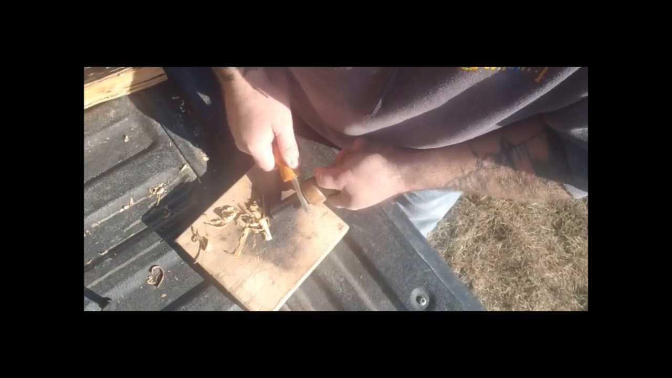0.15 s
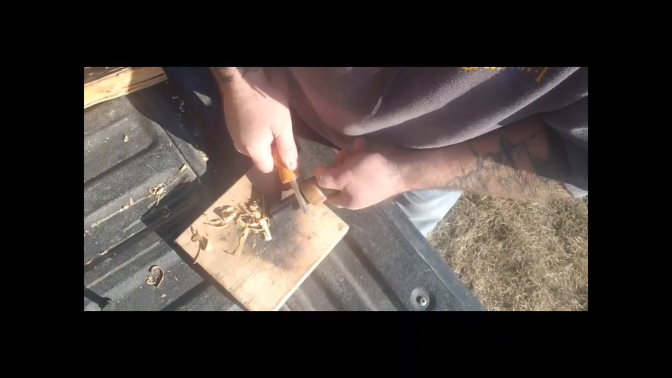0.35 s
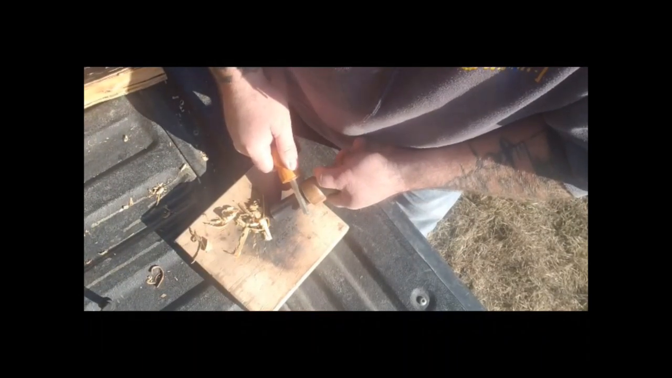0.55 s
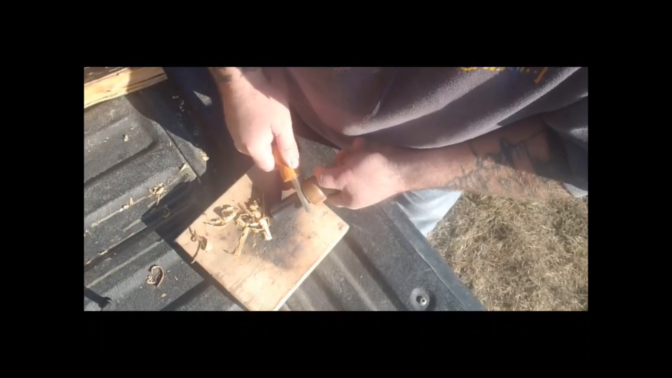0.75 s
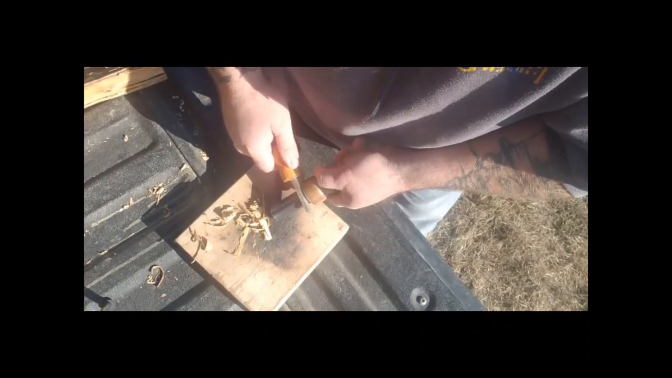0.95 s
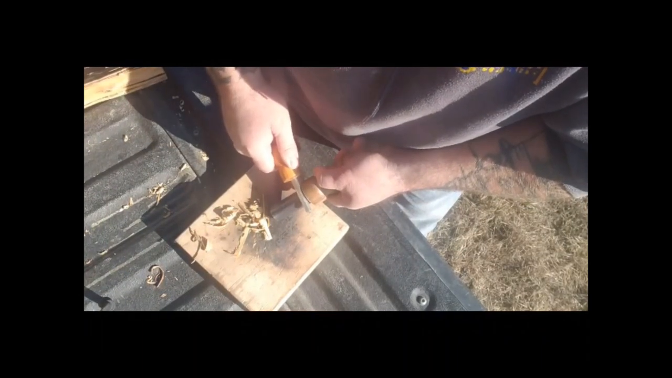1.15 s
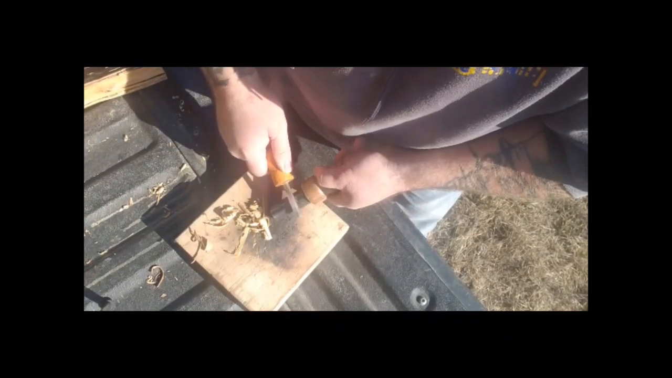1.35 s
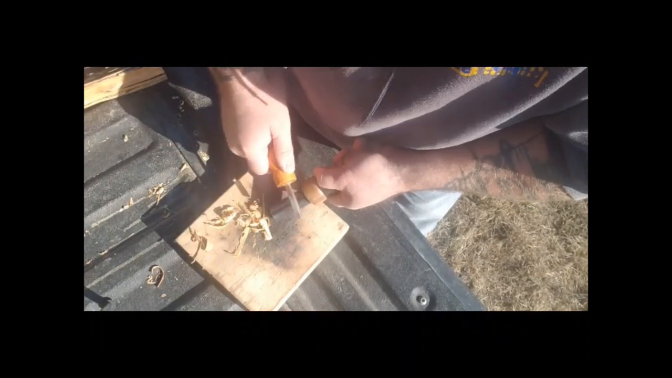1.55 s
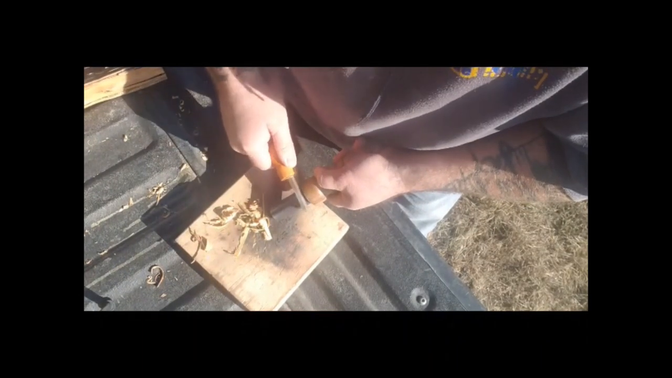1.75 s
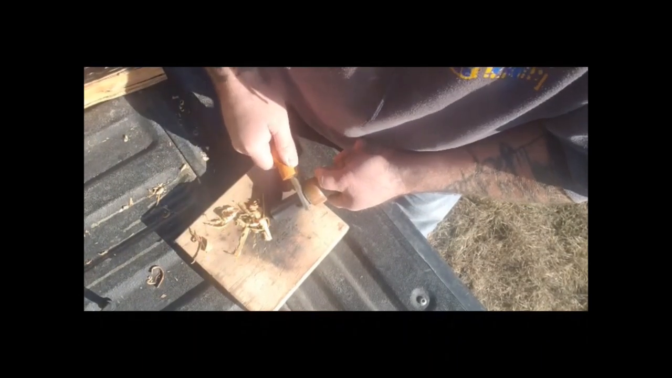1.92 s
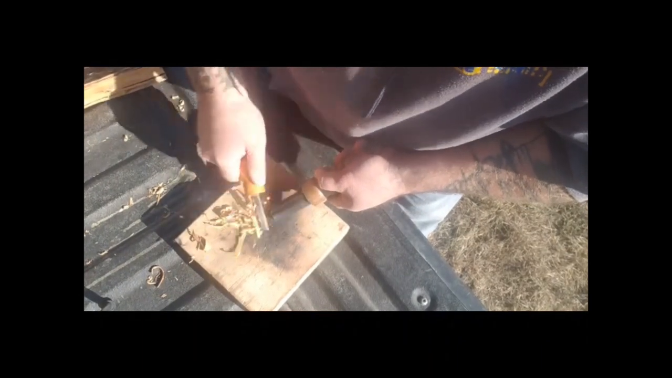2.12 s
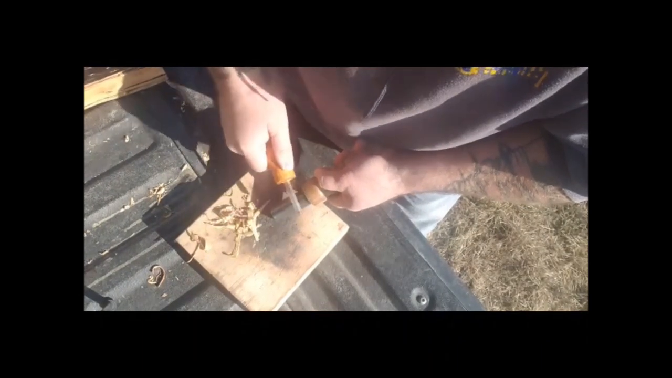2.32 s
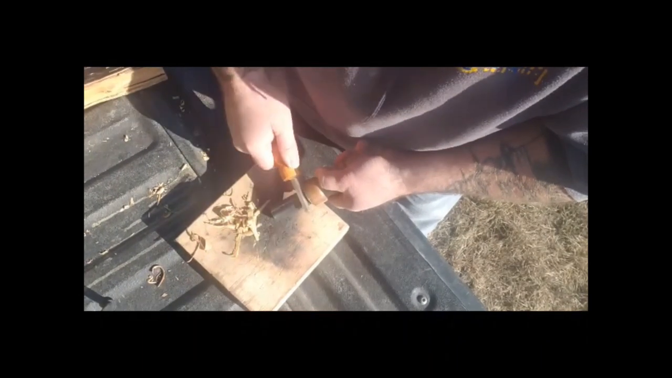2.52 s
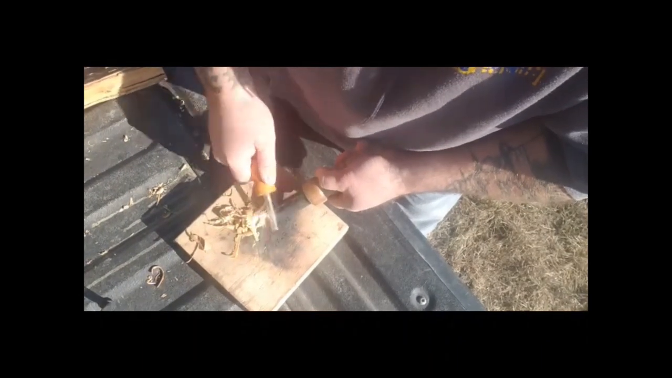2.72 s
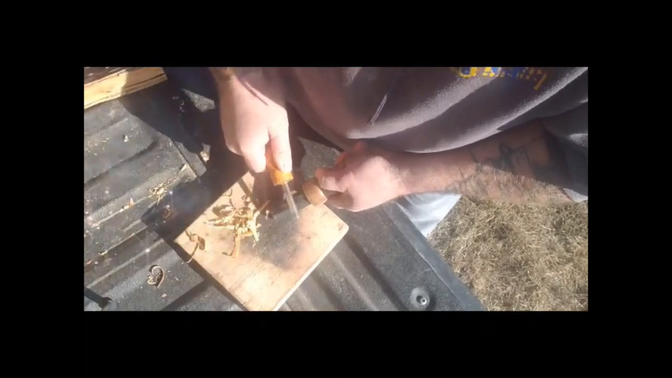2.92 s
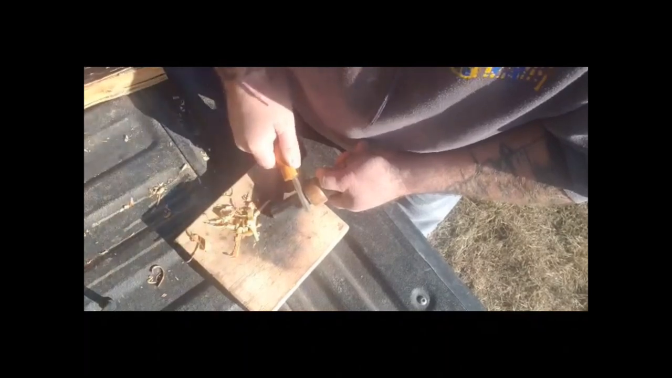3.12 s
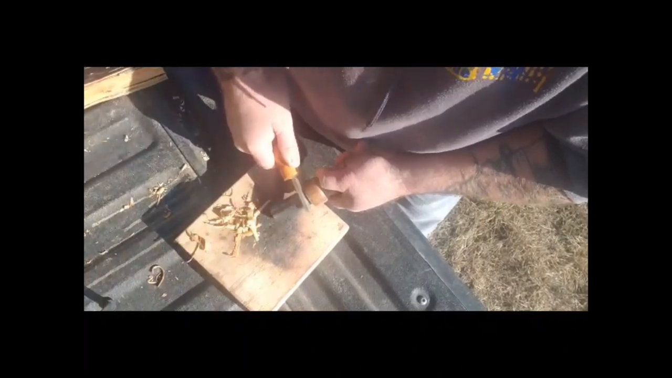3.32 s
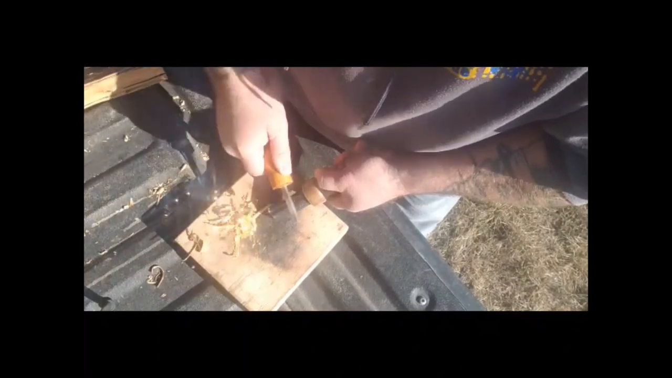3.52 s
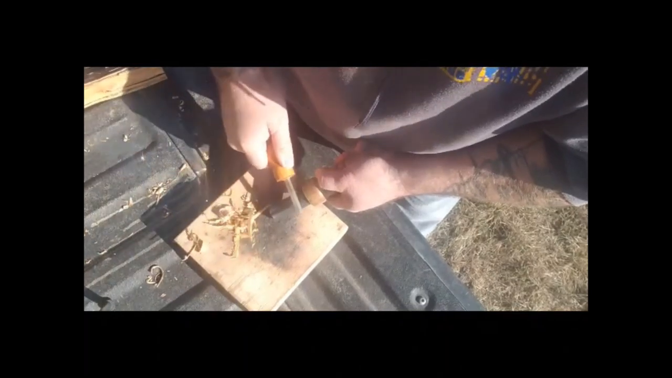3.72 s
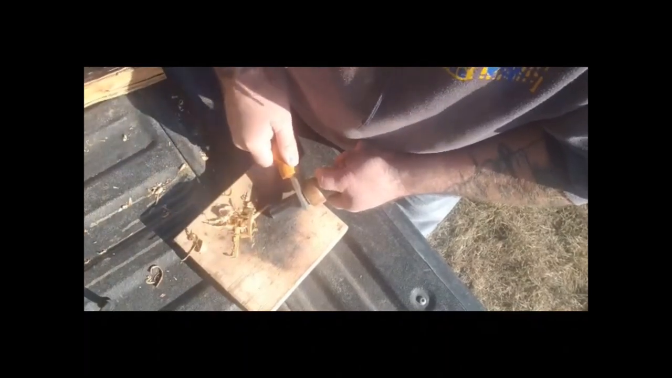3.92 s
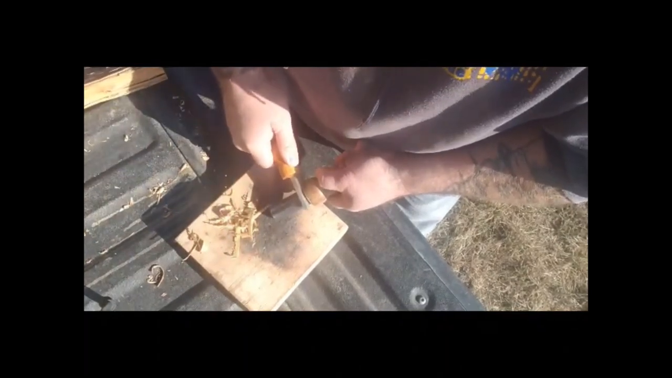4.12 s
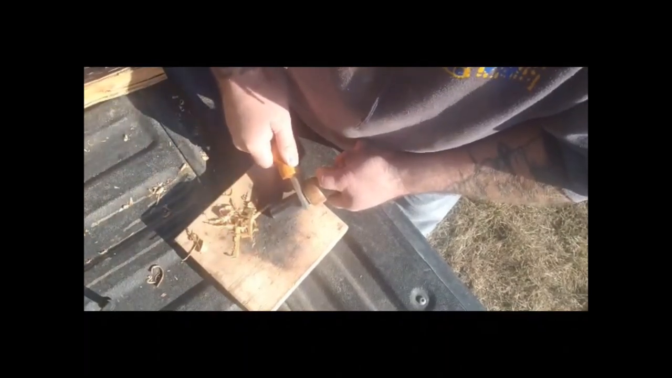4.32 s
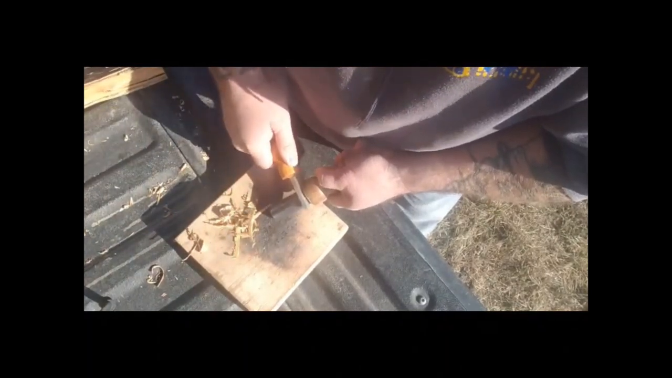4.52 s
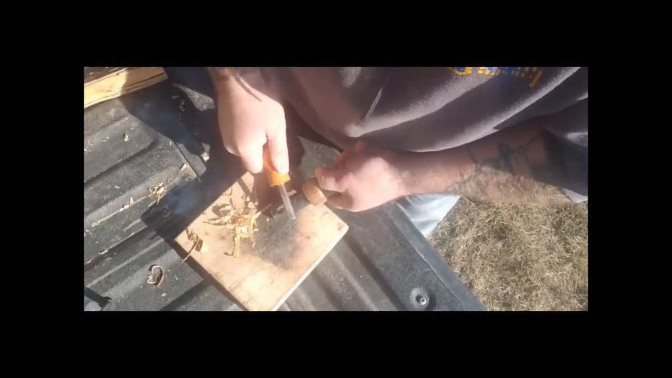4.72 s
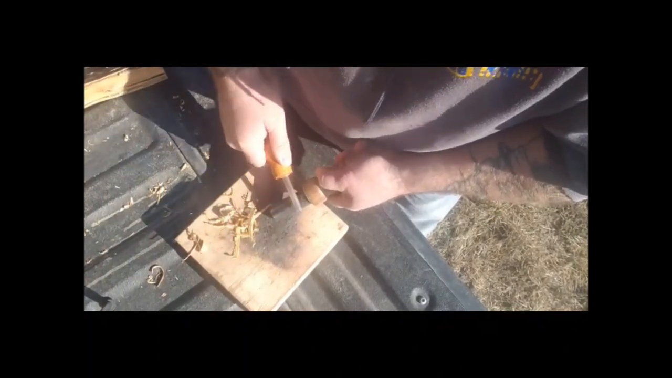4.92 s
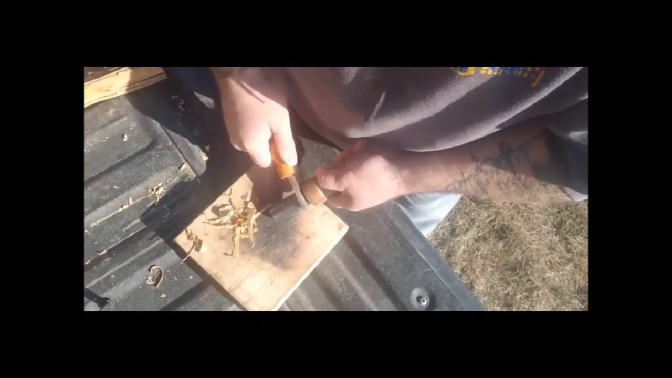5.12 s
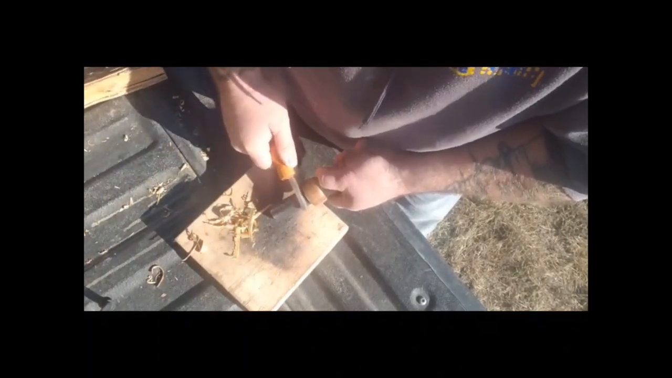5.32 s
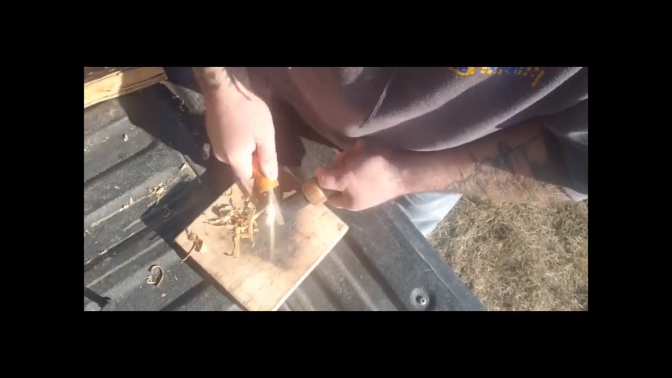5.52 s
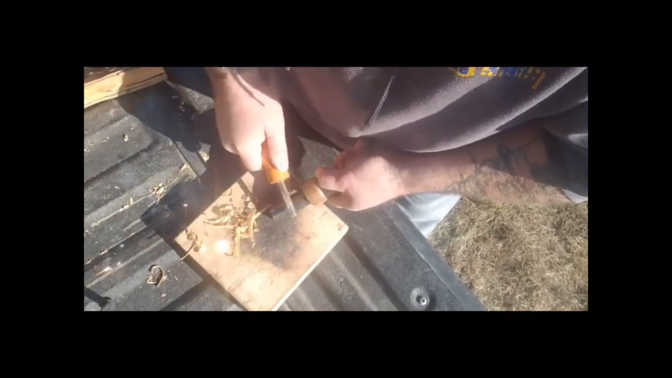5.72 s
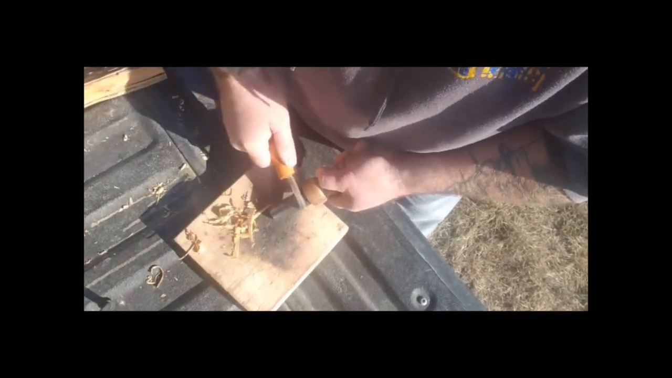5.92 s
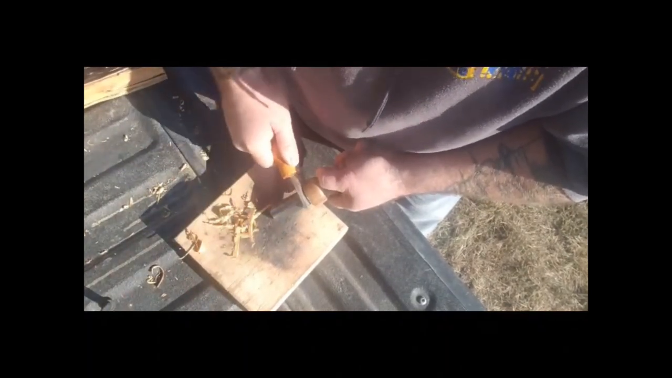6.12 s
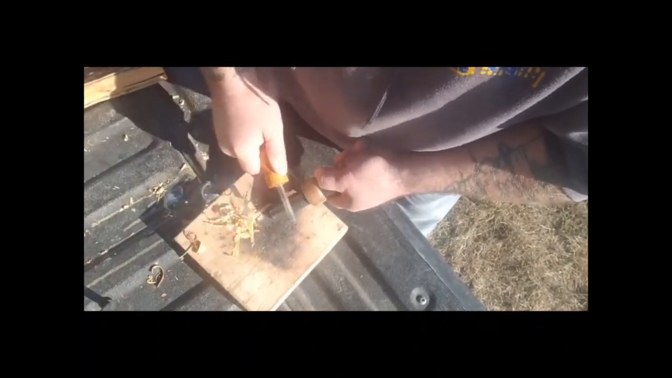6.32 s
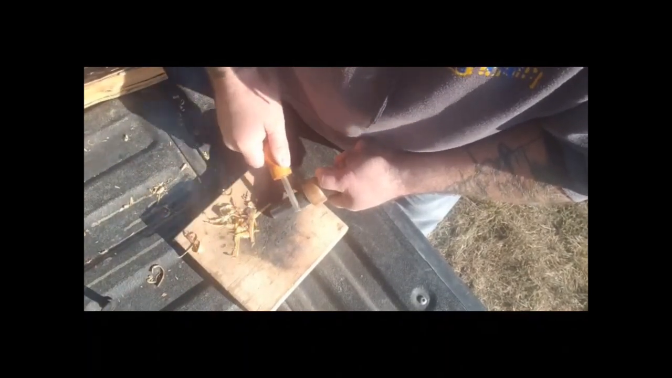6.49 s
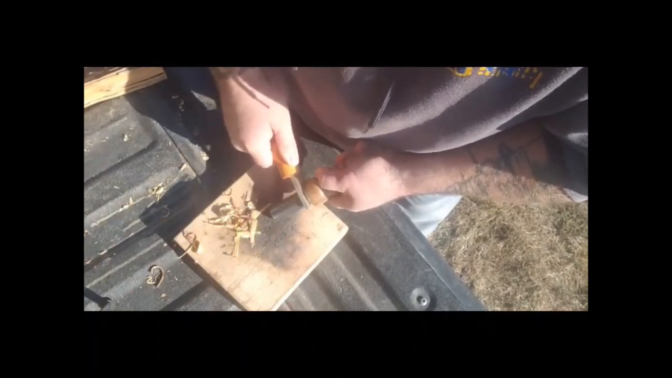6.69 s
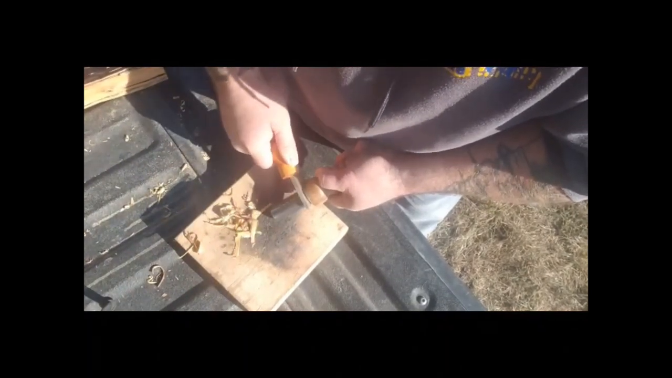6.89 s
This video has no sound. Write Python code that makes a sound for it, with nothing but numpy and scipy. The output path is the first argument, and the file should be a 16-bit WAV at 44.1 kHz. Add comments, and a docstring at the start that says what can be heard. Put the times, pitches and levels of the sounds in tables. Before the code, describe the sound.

Seven quick, hard scrapes of a steel blade on a fire starter rod come roughly a second apart, close to the microphone. Each bites with a chirping rasp, knocks dully through a board on a tailgate and throws a brief hiss of crackling sparks. Small metal taps and faint hand scuffs fall between strokes. Wind buffets the microphone, mostly at the start, over a faint outdoor hush.

```python
"""A steel blade scrapes down a ferro rod seven times, over a board on a pickup's tailgate, outdoors.
The edge chatters as it sticks and slips and rasps as it tears off chips; board and tailgate boom.
The shavings fizz and pop as they burn, and the blade clicks back onto the rod between strokes.
Hands scuff on the handle and the board, and wind buffets the microphone over a faint hush."""
import sys
import numpy as np
from scipy import signal
from scipy.fft import rfft, irfft, next_fast_len
from scipy.io import wavfile
from scipy.ndimage import uniform_filter1d

SR = 44100
rng = np.random.default_rng(int(sys.argv[2]) if len(sys.argv) > 2 else 0)


def wrap_up_sound(samples):
    """Save the sound to the file named by the first command line argument, as 16-bit audio."""
    columns = np.atleast_2d(samples).T
    # keep every value between -1 and 1, then stretch to whole-number steps
    tamed = np.clip(columns, -1, 1)
    steps = np.round(tamed * 32767).astype(np.int16)
    wavfile.write(sys.argv[1], SR, steps)


N = 306495
TIME = np.arange(N) / SR


def amp(db):
    """Decibels to gain."""
    return 10 ** (np.asarray(db) / 20)


def unit(x):
    """Scale to rms 1."""
    return x / np.sqrt(np.mean(x ** 2))


def colour(x, points):
    """Causal EQ through (Hz, dB) points, built from its cepstrum."""
    size = next_fast_len(len(x) + 8192, real=True)
    hz, db = np.transpose(points)
    bin_hz = np.arange(size // 2 + 1) * SR / size
    log_gain = np.log(amp(np.interp(np.log(bin_hz + 1), np.log(hz), db)))
    cepstrum = irfft(log_gain, size)
    cepstrum[1:size // 2] *= 2
    cepstrum[size // 2 + 1:] = 0
    return irfft(rfft(x, size) * np.exp(rfft(cepstrum)), size)[:len(x)]


def noise(points):
    """White noise through an EQ."""
    return colour(rng.standard_normal(N), points)


def wander(rate_hz):
    """Smooth, bounded random drift with rms 1."""
    knots = rng.uniform(-0.92, 1, N // 10)
    return unit(np.interp(TIME * rate_hz, np.arange(len(knots)), knots))


def grit(per_s, spread_db):
    """Random micro-fractures, most small and a few large."""
    sizes = amp(spread_db * np.minimum(rng.exponential(size=N), 5))
    return (rng.random(N) < per_s / SR) * sizes * rng.choice([-1, 1], N)


def sputter(per_s, spread_db, fall_s):
    """Envelope of tiny random bursts, each starting at once and dying quickly."""
    energy = grit(per_s, spread_db) ** 2 + 1e-18
    return np.sqrt(signal.lfilter([1], [1, -np.exp(-2 / (fall_s * SR))], energy))


def steady(x, window_s):
    """Even out slow swells, so that an envelope alone sets the force."""
    return x / np.sqrt(uniform_filter1d(x ** 2, max(int(window_s * SR), 2)) + 1e-12)


def swell(at, rise_s, fall_s, round_s):
    """Exponential rise and fall with a rounded top."""
    lag = TIME - at
    return np.exp(-(np.hypot(lag, round_s) - round_s) / np.where(lag < 0, rise_s, fall_s))


def hold(at, rise_s, hold_s, fade_s, sag_db_per_s=0):
    """Envelope that builds to its peak, holds or sags, then fades."""
    lag = TIME - at
    attack = np.clip(1 + lag / rise_s, 0, 1) ** 2
    sustain = amp(-sag_db_per_s * np.clip(lag, 0, hold_s))
    return attack * sustain * np.exp(-np.maximum(lag - hold_s, 0) / fade_s)


def surge(at, rise_s, fall_s):
    """Envelope that builds to its peak and dies straight away."""
    return hold(at, rise_s, 0, fall_s)


def push(at, hz):
    """One smooth shove out and back."""
    cycles = (TIME - at) * hz
    return np.sin(2 * np.pi * cycles) * np.exp(-2 * cycles ** 2)


# Tone of the open air. Each row: frequency in Hz, gain in dB.
AIR_EQ = [(25, 4.5), (400, 8.5), (800, -2.5), (2500, -4), (5000, -9), (8000, -17.5), (12500, -7),
          (16000, -11)]


def air(level_db=-76.5):
    """A faint, wide bed of outdoor hush."""
    centre = rng.standard_normal(N)
    sides = [unit(colour(centre + rng.standard_normal(N), AIR_EQ)) for _ in range(2)]
    return amp(level_db) * np.array(sides)


# Gusts on the microphone. Each row: peak time in seconds, level in dB, hold in seconds.
GUSTS = [(0.014, -56.5, 0.1), (0.156, -42, 0.27), (0.454, -47.5, 0.23), (0.639, -43.5, 0.066),
         (0.775, -50.5, 0.084), (0.908, -54, 0.082), (1.089, -45.5, 0.024), (1.172, -50, 0.058),
         (1.26, -66, 0.42), (1.913, -53.5, 0.073), (2.083, -51.5, 0.079), (2.239, -47, 0.14),
         (2.436, -53.5, 0.15), (2.595, -51, 0.054), (3.347, -56.5, 0.18), (3.687, -56.5, 0.29),
         (4.284, -68.5, 0.05), (4.448, -51, 0.065), (4.875, -59.5, 0.16), (5.333, -63, 0.024),
         (5.816, -56.5, 0.3), (6.482, -47, 0.15), (6.719, -55.5, 0.15)]
# Their rumble. Each row: frequency in Hz, gain in dB.
GUST_EQ = [(20, -22), (45, 12), (70, 11.5), (130, 2), (220, -8.5), (400, -14), (600, -31), (1000, -52.5),
           (3000, -71.5)]
# Single buffets of air. Each row: centre in seconds, level in dB, pitch in Hz.
BUFFETS = [(0.417, -28, 75), (0.804, -32, 97), (1.112, -56, 69)]


def wind(flutter_db=4.5, side_db=-1, breeze_db=-79):
    """Gusts flutter on the microphone over a faint breeze, widest in the low end."""
    gusts = sum(amp(db) * hold(at, 0.02, length, fade_s=0.032, sag_db_per_s=19)
                for at, db, length in GUSTS)
    force = (amp(breeze_db) + gusts) * amp(flutter_db * wander(45))
    mid = force * steady(noise(GUST_EQ), window_s=0.063)
    mid += sum(amp(db) * push(at, hz) for at, db, hz in BUFFETS)
    lows = noise([(20, -10.5), (55, -0.5), (120, -14.5), (400, -29), (1100, -64.5)])
    side = amp(side_db) * force * steady(lows, window_s=0.1)
    return np.array([mid + side, mid - side])


# Hands shift their grip and rub the board. Each row: time in seconds, level in dB, hold in seconds.
RUBS = [(0.268, -58.5, 0.011), (1.229, -61.5, 0.033), (1.297, -67.5, 0.066), (1.784, -72, 0.347),
        (2.946, -55, 0.042), (6.083, -67.5, 0.19)]
# Their dull tone. Each row: frequency in Hz, gain in dB.
RUB_EQ = [(120, -29), (380, 11), (580, -0.5), (1100, -22), (1500, -40), (2300, -28), (4000, -47)]


def rubs(uneven_db=4):
    """Skin and handle drag unevenly, with a low scuff."""
    force = sum(amp(db) * hold(at, 0.011, length, fade_s=0.0069) for at, db, length in RUBS)
    return force * amp(uneven_db * wander(90)) * unit(noise(RUB_EQ))


# Light skids along the rod. Each row: time in seconds, level in dB, hold in seconds.
SKIDS = [(0.375, -68.5, 0.019), (0.731, -69.5, 0.018), (1.439, -54, 0.034), (1.471, -34.5, 0.0064),
         (2.065, -63.5, .014), (2.081, -48, 0.0034), (2.105, -44.5, 0.098), (2.777, -56, 0.037),
         (3.505, -41, 0.014), (4.646, -53, 0.018), (4.664, -39, 0.011), (5.612, -40, 0.014),
         (6.309, -42, 0.02)]
# The seven strokes, which also drive the boom, tearing and chatter. Each row: hardest bite in seconds,
# chatter level in dB, its rise and fall in seconds, slip rate in Hz, glide as a share of that rate,
# rasp level in dB, boom level in dB, boom delay in seconds.
STROKES = [(1.501, -26.5, 0.011, 0.0065, 550, -0.03, -32.5, -44, 0.034),
           (2.179, -23.5, .008, 0.0053, 727.7, -0.1, -31, -33, 0.069),
           (2.82, -20.5, 0.0022, 0.012, 814.7, -0.24, -29, -43, 0.04),
           (3.531, -18, 0.0043, 0.015, 825.8, -0.12, -27.5, -26, 0.058),
           (4.695, -17.5, 0.004, 0.0036, 851.2, .1, -30.5, -32.5, 0.056),
           (5.636, -18, 0.005, 0.0073, 798.7, 0.14, -27.5, -27.5, 0.066),
           (6.341, -17.5, 0.0057, 0.007, 833.5, 0.15, -26, -27, 0.057)]
# Tone of the scraped tool and board. Each row: frequency in Hz, gain in dB.
RASP_EQ = [(100, -35.5), (260, -9.5), (380, 5.5), (570, 5), (720, -5.5), (900, -2), (1080, -10),
           (1330, -15.5), (1650, -9.5), (2000, -24.5), (2380, -25.5), (2700, -20.5), (4000, -26),
           (4500, -25), (5100, -22.5), (12000, -39)]


def rasp(delay_s=0.021, rise_s=0.045, fall_s=0.023):
    """Chips tear off the rod and shake the tool and the board; a light skid sounds duller."""
    stroke_force = sum(amp(db) * surge(at + delay_s, rise_s, fall_s) for at, *_, db, _, _ in STROKES)
    skid_force = sum(amp(db) * hold(at, 0.0065, length, fade_s=0.009) for at, db, length in SKIDS)
    chips = colour(grit(per_s=2100, spread_db=0.5), RASP_EQ)
    skid = colour(chips, [(500, -8.5), (950, 7.5), (1600, -9)])
    return stroke_force * steady(chips, window_s=0.0027) + skid_force * steady(skid, window_s=0.026)


# Blade meets rod. Each row: start in seconds, level in dB, treble tilt in dB per octave, rattle in dB.
TAPS = [(.745, -54, -4, 0), (1.875, -41, -6.5, 2), (2.566, -42.5, 1.5, -2), (3.205, -36, 2, -6.5),
        (3.917, -39.5, 2.5, -8), (5.12, -46.5, 4.5, -3), (5.987, -43.5, -6, -3), (6.704, -40.5, 2.5, -4)]
# Ring of blade, rod and handle. Each row: pitch in Hz, level in dB, seconds to fall by 60 dB.
TOOL_MODES = [(341, -17, 0.1), (466, -5.5, 0.096), (574, 2, 0.033), (788, 8, 0.0087), (1055, 3, 0.01),
              (1720, 2, 0.022), (1980, 7.5, 0.0061), (2355, -2.5, 0.053), (2717, -0.5, 0.029),
              (3600, -5.5, 0.01), (5470, -0.5, 0.0065), (8600, -8, 0.007)]


def taps(rattle_s=0.026, tick_s=0.00099, detune=0.008):
    """The blade lands on the rod with a knock and rattles to rest, keeping the tool ringing."""
    track, t = np.zeros(N), TIME[:SR // 5]
    for at, db, tilt_db, rattle_db in TAPS:
        tuning = 1 + detune * rng.standard_normal(len(TOOL_MODES))  # the grip shifts the modes
        ring = sum(amp(mode_db - 60 * t / t60) * np.sin(2 * np.pi * hz * shift * t)
                   for shift, (hz, mode_db, t60) in zip(tuning, TOOL_MODES))
        tick = rng.standard_normal(len(t)) * np.exp(-t / tick_s)
        knock = colour(ring + tick, [(100, -9), (330, 0), (6500, 0), (10000, -6)])
        rattle = rng.standard_normal(len(t)) * np.exp(-t / rattle_s)
        rattle *= amp(rattle_db) / np.linalg.norm(rattle)
        touches = colour(rattle, [(1000, 6), (1700, -10), (2400, -6.5), (3500, -7)])
        touches[0] += 1  # the first blow is brighter than the later, softer touches
        tap = signal.fftconvolve(touches, knock)[:len(t)]
        tap = colour(tap, [(2000, 0), (16000, 3 * tilt_db)])
        tap *= amp(db) / np.std(tap[:SR // 100])
        start = int(at * SR)
        track[start:start + len(tap)] += tap[:N - start]
    return track


# Low body of the board and tailgate. Each row: frequency in Hz, gain in dB.
BOOM_EQ = [(25, -23.5), (77, -2.5), (94, -0.5), (115, -7.5), (155, 6), (240, -16), (340, -6), (480, -15.5),
           (750, -30), (1500, -30), (4000, -59)]


def boom(lead_s=0.037, fall_s=0.037, tail_db=-27, tail_s=0.18, thud_db=-13):
    """Each tap gives a small thud; each stroke booms in the board and rumbles on in the tailgate."""
    force = sum(amp(db + thud_db) * surge(at + 0.036, rise_s=0.053, fall_s=0.013) for at, db, *_ in TAPS)
    for at, *_, db, delay in STROKES:
        board = surge(at + delay, delay + lead_s, fall_s)
        tailgate = amp(tail_db) * surge(at + delay, delay + lead_s, tail_s)
        force += amp(db) * (board + tailgate)
    return force * steady(noise(BOOM_EQ), window_s=0.29)


# Showers of burning shavings. Each row: full blaze in seconds, level in dB, then rise, hold and fade
# in seconds.
SHOWERS = [(1.488, -42.5, 0.055, 0.077, 0.031), (2.181, -37, 0.11, 0.011, 0.017),
           (2.841, -39.5, 0.079, 0.13, 0.014), (3.527, -37.5, 0.049, 0.051, 0.071),
           (4.698, -40, 0.069, 0.079, 0.053), (5.627, -39.5, 0.033, 0.22, 0.036),
           (6.339, -41, 0.061, 0.0036, 0.082)]
# Stray shavings that burn on. Each row: peak time in seconds, level in dB, burn in seconds.
EMBERS = [(1.64, -57, 0.021), (2.98, -56.5, 0.25), (3.289, -64, 0.052), (3.73, -61.5, 0.17),
          (3.99, -68, 0.16), (4.97, -60, 0.14), (5.23, -74, 0.085), (5.39, -76.5, 0.067),
          (5.98, -60, 0.022), (6.098, -66.5, 0.098), (6.5, -67.5, 0.1), (6.691, -58.5, 0.067)]


def burning():
    """How fiercely the shavings burn: a shower at each stroke, then stray embers."""
    showers = sum(amp(db) * hold(at, rise, length, fade, sag_db_per_s=38.5)
                  for at, db, rise, length, fade in SHOWERS)
    embers = sum(amp(db) * hold(at, 0.084, length, fade_s=0.039, sag_db_per_s=28)
                 for at, db, length in EMBERS)
    return np.hypot(showers, embers)


# Hiss of the flame. Each row: frequency in Hz, gain in dB.
FIZZ_EQ = [(100, -4), (400, 11), (800, -5.5), (1300, 0.5), (1650, 0), (4000, -3), (7000, -4.5),
           (10000, -1.5), (12500, 0.5), (16000, -3.5)]


def fizz(flicker_db=1.7, crackle_db=-30, gate_db=-68):
    """Burning shavings hiss and flicker; they spread over the board, so the treble is wide."""
    blaze = burning()
    # the crackle dies more slowly than the hiss, so the tail of a shower sputters
    crackle = amp(crackle_db) * np.sqrt(blaze) * np.tanh(blaze / amp(gate_db))
    crackle *= sputter(per_s=70, spread_db=2.7, fall_s=0.0014)
    flame = np.hypot(blaze * amp(flicker_db * wander(110)), crackle)
    side = colour(flame * unit(noise(FIZZ_EQ)), [(1500, -4), (5000, 0.8)])
    mid = flame * unit(noise(FIZZ_EQ))
    return np.array([mid + side, mid - side])


def tearing(tear_db=-42, delay_s=0.009, blaze_db=-9):
    """Flakes snap off under the edge with a bright, metallic grit, and crackle on while they burn."""
    bites = sum(surge(at + delay_s, rise_s=0.022, fall_s=0.01) for at, *_ in STROKES)
    force = amp(tear_db) * bites + amp(blaze_db) * burning()
    snaps = unit(sputter(per_s=170, spread_db=2, fall_s=0.001))
    sizzle = unit(noise([(800, -13.5), (2400, 4), (3400, -2.5), (4600, -1), (15000, -3)]))
    return force * snaps * sizzle


# Voice of the chattering edge. Each row: frequency in Hz, gain in dB.
CHATTER_EQ = [(150, -30.5), (400, -15.5), (570, 7.5), (870, -2.5), (1060, -1), (1300, -18.5), (1700, -31.5),
              (6000, -44.5)]


def chatter(jitter=0.045, sag=0.17, glide_s=0.025, rough_db=2.5, squeal_db=-22, firm_db=-26):
    """The edge sticks and slips; the rate glides with the hand and sags as the blade leaves the rod."""
    rate_hz, force = np.full(N, 800.), np.zeros(N)
    for at, db, rise, fall, slip_hz, glide, *_ in STROKES:
        near = abs(TIME - at) < 0.3
        travel = np.tanh((TIME[near] - at) / glide_s)
        rate_hz[near] = slip_hz * (1 + glide * travel - sag * np.maximum(travel, 0) ** 2)
        # a light squeal leads into the hard bite
        squeal = amp(squeal_db) * swell(at, 0.01, fall, round_s=0.009)
        bite = swell(at, rise, fall, round_s=0.0088)
        force += amp(db) * (squeal + bite)
    # firm pressure locks the slips into step; a light touch lets them stumble
    stumble = 1 + 2 * np.exp(-force / amp(firm_db))
    cycles = np.cumsum(rate_hz * (1 + jitter * stumble * wander(600))) / SR
    slips = np.diff(np.floor(cycles), prepend=0) * amp(rough_db * stumble * wander(700))
    return force * steady(colour(slips - slips.mean(), CHATTER_EQ), window_s=0.005)


# The edge catches and jumps off. Each row: time in seconds, level in dB, ring in Hz, decay in seconds.
CATCHES = [(1.509, -19, 1640, 0.00067), (2.173, -32.5, 1640, .0005), (2.186, -22.5, 3520, .0016),
           (2.839, -23, 2570, 0.00052), (3.545, -17.5, 4820, 0.0016), (3.555, -22.5, 4800, 0.0012),
           (3.556, -22, 1610, 0.0012), (4.697, -26.5, 2340, 0.022), (5.645, -20, 4440, 0.0015),
           (5.658, -20.5, 1677, 0.00082), (6.352, -19.5, 4480, 0.0017), (6.36, -11, 1600, 0.00034)]


def catches(jolt_hz=600, ring_db=-10):
    """A snagged edge lets go with a dull jolt and a short ring of the tool."""
    track = np.zeros(N)
    for at, db, hz, decay in CATCHES:
        ring = np.sin(2 * np.pi * hz * (TIME - at)) * swell(at, 0.00019, decay, round_s=0.00014)
        track += amp(db) * (push(at, jolt_hz) + amp(ring_db) * ring)
    return track


# Bursting sparks. Each row: time in seconds, level in dB, decay in seconds, relative body in dB.
POPS = [(1.623, -39, 0.0017, -7), (1.655, -54, 0.0018, -11), (2.265, -24, 0.0087, -8),
        (2.276, -30, 0.013, 0.5), (2.307, -45, 0.029, -2), (2.321, -40.5, 0.003, 3.5),
        (3.741, -45.5, 0.0038, 5), (4.188, -41, 0.0011, -28), (4.191, -53.5, 0.035, -7),
        (4.862, -51, 0.001, -7), (4.908, -52, 0.0022, -2), (4.988, -49.5, 0.0022, -10),
        (5.075, -44.5, 0.015, -3), (5.769, -37.5, 0.0008, -10), (5.837, -39, 0.012, -1),
        (5.963, -39, 0.0052, -20), (6.136, -49, 0.008, -14), (6.52, -49, 0.0096, 7),
        (6.616, -45, 0.0014, -2)]
# Their bright spit. Each row: frequency in Hz, gain in dB.
SPIT_EQ = [(1500, -13), (5000, -4.5), (7500, -5), (10300, 1.5), (13000, 5.5)]


def pops(snap_db=12, pan_db=0.5):
    """A spark bursts with a sharp snap, a gritty spit and some midrange body, a little to the right."""
    spit_force, body_force, snaps = np.zeros((3, N))
    for at, db, decay, body_db in POPS:
        burst = amp(db) * swell(at, 0.0004, decay, round_s=0.00023)
        spit_force += burst
        body_force += amp(body_db) * burst
        snaps[int(at * SR)] += amp(db + snap_db)
    sides = []
    for gain in amp([-pan_db, pan_db]):
        spit = spit_force * unit(grit(per_s=12000, spread_db=1.5))
        body = body_force * unit(grit(per_s=12000, spread_db=1.5))
        sides.append(gain * (colour(spit + snaps, SPIT_EQ) + colour(body, [(3500, 3), (8000, -14)])))
    return np.array(sides)


# Stereo width of the echoes. Each row: frequency in Hz, side gain in dB.
WIDTH_EQ = [(50, -15), (700, -9), (1300, -9.5), (2600, -3)]


def reflections(x, decay_s=0.011):
    """Early echoes off the board, hands and truck bed widen the sound."""
    t = TIME[:SR // 20]
    impulse = rng.standard_normal(len(t)) * np.exp(-t / decay_s)
    echoes = signal.fftconvolve(x, impulse / np.linalg.norm(impulse))[:N]
    side = colour(echoes * wander(70), WIDTH_EQ)  # a quick random flutter keeps left and right balanced
    return np.array([x + side, x - side])


def scene():
    """Strokes, sparks and taps close by, in a light wind."""
    left, right = reflections(chatter() + rasp() + tearing() + catches() + boom() + taps() + rubs())
    left = np.roll(left, 2)  # the hands are a little to the right, so the left hears them later
    return np.array([left, right]) + fizz() + pops() + wind() + air()


def record(dry):
    """A steep low-pass trims the very top."""
    top_hz = 15600
    return signal.sosfilt(signal.ellip(10, 0.2, 70, top_hz, fs=SR, output="sos"), dry)


dry = scene()
out = record(dry)
wrap_up_sound(out)
```